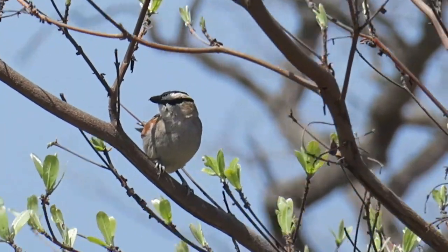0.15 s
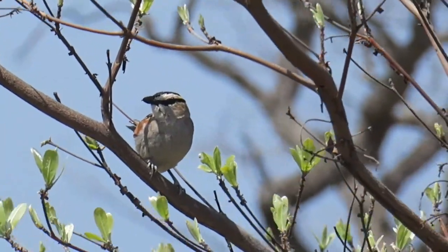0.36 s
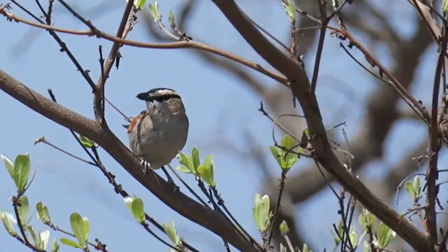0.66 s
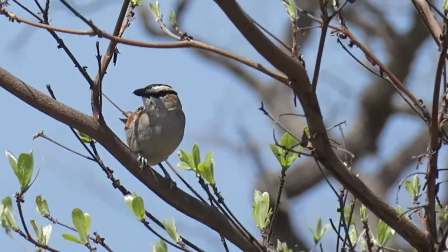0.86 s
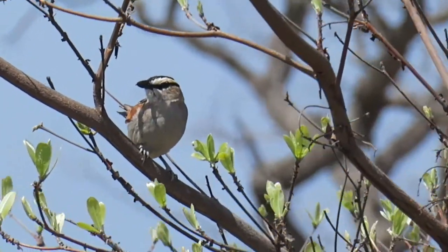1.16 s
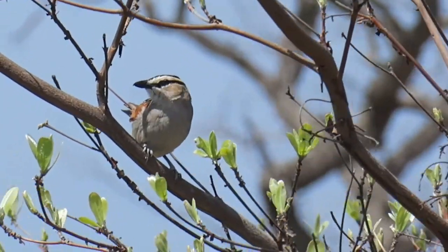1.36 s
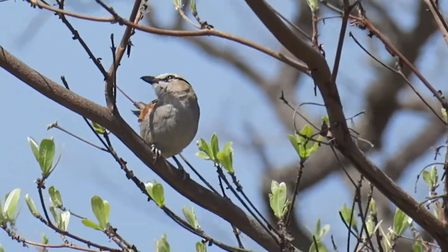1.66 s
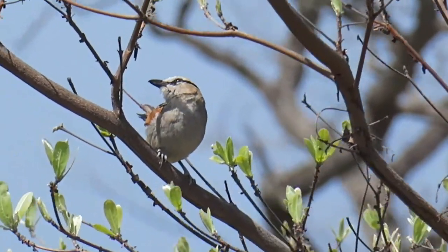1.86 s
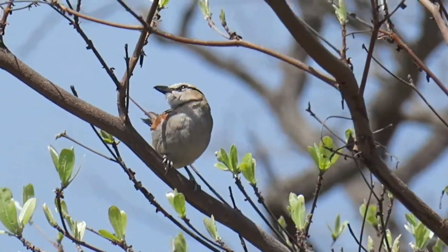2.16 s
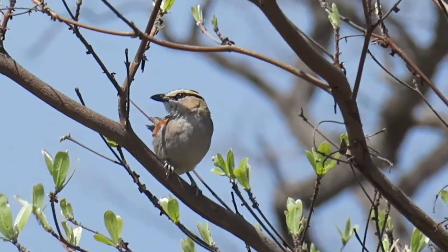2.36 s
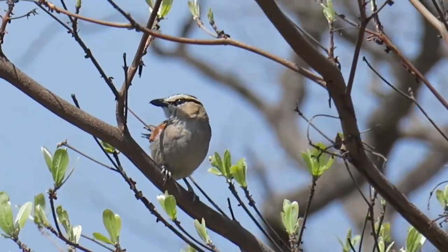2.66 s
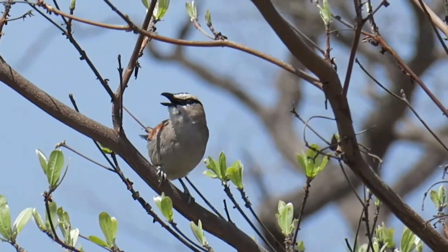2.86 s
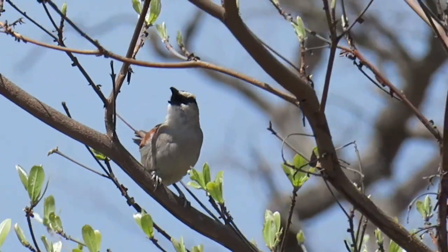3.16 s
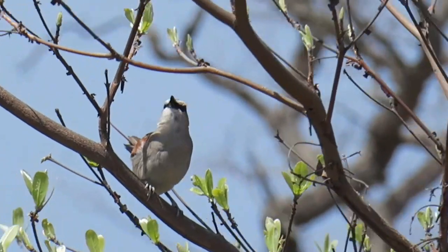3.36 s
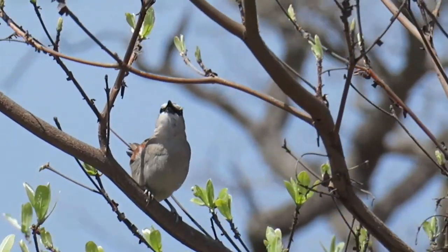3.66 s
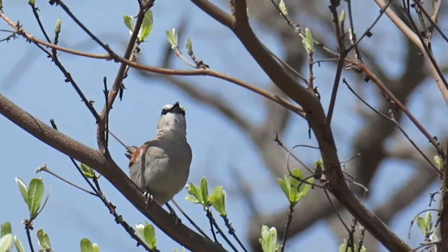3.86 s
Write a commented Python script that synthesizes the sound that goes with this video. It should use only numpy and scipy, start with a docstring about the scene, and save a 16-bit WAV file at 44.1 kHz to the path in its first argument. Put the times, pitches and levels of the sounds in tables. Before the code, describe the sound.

Clear, close shrike whistles follow softer falling bird calls over a light rumble of wind.

```python
"""A bush shrike whistles clean, loud notes close to a stereo microphone in bushland.
Deeper in the trees one bird sweeps down with a faint half-pitch tone under its calls, one flicks hooked
calls with a trill, one says 'tew'; far off one whines, and thin notes follow late on. Each call is a sine
or a stack of sines gliding in pitch and level; foliage scatters it and the trees echo it. Leaves rustle
in clumps of tiny clicks, and wind rumbles and thumps on the microphone over a distant hush."""
import sys
import numpy as np
from scipy import signal
from scipy.fft import rfft, irfft, next_fast_len
from scipy.io import wavfile
from scipy.ndimage import uniform_filter1d, map_coordinates

SR = 44100
rng = np.random.default_rng(int(sys.argv[2]) if len(sys.argv) > 2 else 0)


def output_pcm(signal):
    """Save a mono or channel-first signal as 16-bit PCM at the path in sys.argv[1].

    Samples are clipped to [-1, 1] before scaling.
    """
    pcm = np.clip(np.atleast_2d(signal).T, -1, 1) * 32767
    wavfile.write(sys.argv[1], SR, np.round(pcm).astype(np.int16))


N = 176400
LEAD_S = .2  # run-in, so echoes already ring at time zero
M = N + int(LEAD_S * SR)
T = np.arange(M) / SR - LEAD_S

# shrike's short whistles and its long one: (time [s], pitch [Hz], level [dB])
WHISTLES = [
    [(2.94, 2760, -65), (2.946, 2767, -61), (2.958, 2860, -58), (2.972, 3030, -70), (2.976, 3080, -67),
     (2.998, 3150, -64.5), (3.014, 3120, -54), (3.022, 3082, -53)],
    [(3.19, 2860, -69.5), (3.222, 2765, -48.5), (3.246, 2730, -41), (3.268, 2565, -42.5),
     (3.284, 2560, -35.5), (3.296, 2626, -42), (3.31, 2700, -32), (3.336, 2840, -31.5),
     (3.354, 2835, -34.5), (3.37, 2882, -43), (3.385, 2940, -66)],
    [(3.87, 2291, -68.5), (3.888, 2271, -47.5), (3.91, 2279, -31), (3.932, 2190, -22.5), (3.954, 2086, -23),
     (3.986, 1860, -31.5), (4.0, 1735, -31)],
]
LONG_WHISTLE = [(3.48, 1935, -68), (3.501, 1883, -52), (3.529, 2031, -30.5), (3.546, 2188, -21.5),
                (3.557, 2292, -24.5), (3.582, 2424, -29), (3.606, 2471, -23.5), (3.636, 2484, -27),
                (3.667, 2380, -30.5), (3.676, 2350, -26.5), (3.735, 2251, -23.5), (3.749, 2210, -26.5),
                (3.765, 2240, -53.5)]
# shrike's harmonics at full voice: (pitch multiple [ratio], gain [dB])
WHISTLE_TONES = [(1, 0.5), (2, -49), (3, -59), (4, -50), (5, -54), (6, -60.5)]
# falling sweeps, the opening one begun in the run-in: (time [s], pitch [Hz], level [dB])
OPENING_SWEEP = [(-.12, 6440, -68), (-.05, 5350, -51), (.005, 4300, -58.5), (.012, 4190, -61)]
SWEEPS = [
    [(0.078, 5940, -65), (0.096, 6460, -70), (0.125, 6060, -52.5), (0.187, 4940, -45), (0.219, 4260, -46.5),
     (0.229, 3920, -51)],
    [(0.311, 5870, -65), (0.326, 6500, -68), (0.355, 6025, -47.5), (0.423, 4610, -45), (0.445, 4060, -42.5),
     (0.451, 3920, -52)],
    [(1.13, 5680, -77), (1.17, 5600, -50), (1.204, 4980, -48.5), (1.23, 4370, -52), (1.244, 3890, -49.5),
     (1.252, 3550, -52)],
    [(1.418, 6460, -69), (1.446, 6370, -60), (1.52, 5250, -50.5), (1.564, 4110, -55), (1.574, 3900, -54)],
    [(1.69, 6550, -62), (1.702, 6560, -63), (1.722, 6090, -51), (1.788, 4880, -44.5), (1.822, 4100, -44.5),
     (1.832, 3840, -44)],
    [(2.21, 5620, -66), (2.242, 5350, -55), (2.27, 4630, -45), (2.28, 4440, -51), (2.296, 3930, -44.5),
     (2.305, 3660, -52)],
    [(3.125, 5420, -54), (3.137, 5330, -64.5), (3.153, 4910, -43.5), (3.165, 4570, -52.5),
     (3.189, 4000, -44.5), (3.202, 3490, -53)],
]
# half-pitch tone under each sweep: (gain [dB])
UNDERTONES_DB = [-30, -29, -30, -21, -30, -28, -30, -30]
# sweeps' balance at the microphone: (pitch [Hz], left over right [dB])
SWEEP_PAN = [(3800, -2.5), (4800, -6), (6000, 0.5), (6500, -7)]
# one hooked call: (time from start [s], pitch [Hz], gain [dB])
HOOK_SHAPE = [(0, 2690, -16), (.003, 3840, 1.5), (.008, 4334, -4), (.014, 4376, -4), (.02, 4044, -5),
              (.027, 3200, -0.5), (.032, 2600, -4), (.041, 1866, -13.5), (0.053, 1600, -22),
              (0.075, 1505, -20.5)]
# hooked calls: (start [s], level [dB], left over right [dB], trill length [s], trill level [dB])
HOOKS = [(0.525, -45, -7.5, 0.041, -68), (0.696, -43.5, -5, .092, -61), (2.405, -44, -4, 0.046, -64),
         (2.577, -42, -5.5, 0.076, -55.5)]
# 'tew' notes: (time [s], pitch [Hz], level [dB])
TEWS = [
    [(1.068, 3680, -47), (1.078, 3370, -55), (1.11, 2916, -39), (1.14, 2820, -62.5)],
    [(2.122, 3400, -53), (2.128, 3640, -56), (2.166, 2930, -44), (2.195, 2930, -49.5)],
    [(3.022, 3630, -50), (3.03, 3430, -46.5), (3.064, 2902, -40.5), (3.1, 2837, -63.5)],
]
# distant whine: (time [s], pitch [Hz], level [dB])
WHINE = [(2.04, 1000, -84), (2.065, 1190, -77), (2.12, 1310, -75), (2.19, 1400, -73), (2.21, 1390, -82)]
# partials of the whine and of a lone sine: (pitch multiple [ratio], gain [dB])
WHINE_TONES = [(2, 0), (3, 2), (4, 2), (5, -1), (6, -11)]
PURE = [(1, 0)]
# first a faint half-pitch tone under the sweeping bird's falling call at 1.4 s, then thin notes:
# (start [s], length [s], first pitch [Hz], last pitch [Hz], level [dB])
FAINT_GLIDES = [(1.408, 0.076, 3300, 3020, -72), (2.922, 0.016, 700, 1370, -61),
                (2.915, 0.026, 1376, 2500, -57), (2.927, 0.025, 1460, 1970, -53),
                (3.218, 0.064, 6440, 6160, -68), (3.395, .09, 6480, 6250, -68.5),
                (3.373, .045, 4050, 3890, -68.5), (3.387, 0.073, 3700, 3110, -71),
                (3.575, .11, 3540, 3360, -68), (3.8, .118, 3440, 3360, -68.5),
                (3.58, 0.075, 4190, 4080, -72), (3.805, 0.095, 4130, 3980, -71)]
# leaf clumps: (start [s], length [s], level before band limits [dB], bottom [Hz], top [Hz])
RUSTLES = [(1.46, 0.076, -60.5, 1500, 4230), (1.806, 0.15, -59.5, 4260, 10000),
           (2.32, 0.018, -47, 1500, 7500), (2.373, 0.018, -49, 1500, 7950), (2.4, .014, -55, 1500, 11000),
           (2.5515, 0.002, -54.5, 1500, 11000)]
# colour of the leaves, the wind rumble and the hush: (frequency [Hz], gain [dB])
LEAF_SPECTRUM = [(800, -49), (2000, 5), (2700, -1), (3500, 4.5), (5500, 1), (7000, -2.5), (8800, -9),
                 (10500, -18), (15700, -47.5)]
RUMBLE_SPECTRUM = [(15, -19.5), (30, -10.5), (60, -6), (100, -8.5), (200, -15), (500, -120)]
HUSH_SPECTRUM = [(20, -17.5), (54, -5.5), (146, -5), (232, -10.5), (450, -13.5), (800, -18), (1400, -25.5),
                 (2000, -26.5), (3500, -29), (6300, -34.5), (7200, -37), (8800, -40.5), (9800, -46.5),
                 (12500, -47.5), (15000, -61), (15800, -67)]
# wind rumble on the microphone: (time [s], level [dB])
WIND = [(0.0, -55.5), (0.18, -48), (0.33, -60), (0.82, -52.5), (0.93, -62), (1.25, -55), (1.9, -68.5),
        (1.97, -78), (2.2, -58.5), (2.84, -69), (3.391, -64.5), (4.0, -68.5)]
# gusts on the microphone ports: (time [s], frequency [Hz], peak level [dB])
THUMPS = [(.8, 51.5, -50), (1.035, 42.7, -46.5)]
# stereo width of the hush: (frequency [Hz], side over mid [dB])
HUSH_WIDTH = [(60, -25.5), (200, -9.5), (500, -6), (1300, 1), (4000, 1), (8000, 3.5), (14000, 10.5)]


def shrike():
    """Close to the microphone: clean whistles whose faint overtones grow with loudness."""
    song = sing([*WHISTLES, LONG_WHISTLE], WHISTLE_TONES, flicker_db=.15, pan=-1.8, full_db=-28.5)
    return echoes(one_sample_late(song, channel=1), wet_db=-26, t60=1, gap_s=.014)


def sweeping_bird():
    """Deep in the trees: falling sweeps with weak tones at half and three halves of the pitch."""
    song = np.zeros((2, M))
    for sweep, under_db in zip([OPENING_SWEEP, *SWEEPS], UNDERTONES_DB):
        tones = [(1 / 2, under_db), (1, 0), (3 / 2, -37)]
        song += sing([sweep], tones, flicker_db=3, pan=SWEEP_PAN, glide_samples=300)
    return echoes(one_sample_late(song, channel=0), wet_db=-8.5, t60=.56, gap_s=.006, foliage_db=-9)


def hook_bird(trill_delay_s=.08, trill_hz=1700, rise_hz_per_s=3600, beat_hz=186):
    """In foliage to the right: a quick rise and long fall, then a low beating trill."""
    song = np.zeros((2, M))
    beat = 1 + np.sin(2 * np.pi * beat_hz * T)
    for start, db, pan_db, length, trill_db in HOOKS:
        hook = [(start + offset, hz, db + gain) for offset, hz, gain in HOOK_SHAPE]
        last_hz = trill_hz + rise_hz_per_s * length
        trill = glide(start + trill_delay_s, length, trill_hz, last_hz, trill_db, fade_s=.03)
        song += sing([hook], PURE, flicker_db=1.3, pan=pan_db)
        song += beat * sing([trill], PURE, flicker_db=1.2, pan=pan_db)
    return echoes(one_sample_late(song, channel=0), wet_db=-10, t60=.65, gap_s=.0056, foliage_db=-5.5)


def tew_bird():
    """Well to the right: short, pure, dropping notes."""
    song = sing(TEWS, PURE, flicker_db=1.5, pan=-8)
    return echoes(song, wet_db=-10.5, t60=.8, gap_s=.013, foliage_db=-11.5)


def faint_calls():
    """A far whine with no fundamental, a half-pitch tone under the sweep at 1.4 s, later thin notes."""
    whine = sing([WHINE], WHINE_TONES, flicker_db=3, pan=-1.5)
    glides = sing([glide(*note, fade_s=.012) for note in FAINT_GLIDES], PURE, flicker_db=3.54, pan=-1.5)
    return echoes(whine + glides, wet_db=-11, t60=.3, gap_s=.01)


def leaves(grains_per_s=10000, spread_db=2.5, rise_share=.16, loss_db=1.5):
    """A little to the left: clumps of tiny leaf clicks that swell quickly, sag and stop."""
    def colour(hz):
        return amp(along(LEAF_SPECTRUM, hz))

    strikes = rng.random(M) < grains_per_s / SR
    grains = strikes * rng.standard_normal(M) * amp(spread_db * wobble(300))
    grains /= np.std(filtered(grains, colour))
    rustle = np.zeros(M)
    for start, length, db, bottom_hz, top_hz in RUSTLES:
        def band(hz):
            return colour(hz) / (1 + (hz / top_hz) ** 6) / (1 + (bottom_hz / (hz + 1)) ** 4)

        progress = np.clip((T - start) / length, 0, 1)
        envelope = amp(db - loss_db * progress) * np.minimum(progress / rise_share, 1) * (progress < 1)
        rustle += filtered(grains * envelope, band)
    return echoes(placed(rustle, pan_db=2.5), wet_db=-2, t60=.26, gap_s=.003)


def wind(gust_db=1.5, side_db=-14.5):
    """On the microphone: lumpy low rumble, near the centre."""
    mid, side = filtered(rng.standard_normal((2, M)), lambda hz: amp(along(RUMBLE_SPECTRUM, hz)))
    times, db = np.transpose(WIND)
    level_db = np.interp(T, times, db) + gust_db * wobble(3.7)
    return amp(level_db) * mid_side(mid, side * amp(side_db))


def thumps(half_width_s=.028):
    """Gusts give short low pushes, alike on both microphone ports."""
    return sum(amp(db) * np.exp(-((T - time) / half_width_s) ** 2) * np.cos(2 * np.pi * hz * (T - time))
               for time, hz, db in THUMPS)


def hush(mid_db=-57, drift_db=.24):
    """Distant air all round: steady noise, wide in the treble."""
    mid, side = rng.standard_normal((2, M))
    mid = filtered(mid, lambda hz: amp(along(HUSH_SPECTRUM, hz)))
    side = filtered(side, lambda hz: amp(along(HUSH_SPECTRUM, hz) + along(HUSH_WIDTH, hz)))
    return amp(mid_db + drift_db * wobble(2.3)) * mid_side(mid, side)


def echoes(x, wet_db, t60, gap_s, foliage_db=-40):
    """Direct sound, close scatter from foliage and the trees' lumpy, slowly changing answer."""
    trees_s, edge_s = .17, .013  # the farthest strong reflectors, how softly they end
    foliage_s, lumps_db = .012, 2
    out, step, t = x.copy(), SR // 8, np.arange(SR // 2) / SR
    reflectors = .25 + 1 / (1 + np.exp((t - trees_s) / edge_s))
    decay = amp(-60 * t / t60) * (1 - np.exp(-t / gap_s)) * reflectors
    for start in range(0, M, step):  # each overlapping piece gets its own echo
        tail = rng.standard_normal((2, len(t))) * decay * amp(lumps_db * wobble(60)[:len(t)])
        scatter = rng.standard_normal(len(t)) * np.exp(-t / foliage_s)
        answer = amp(wet_db) * tail / np.linalg.norm(tail[0])
        answer += amp(foliage_db) * scatter / np.linalg.norm(scatter)
        piece = x[:, start:start + 2 * step]
        window = np.sin(np.pi * np.arange(piece.shape[1]) / (2 * step))
        wet = signal.fftconvolve(piece * window, answer, axes=1)[:, :M - start]
        out[:, start:start + wet.shape[1]] += wet
    return out


def sing(notes, tones, flicker_db, pan, full_db=-200, glide_samples=88, edge_s=.004):
    """A bird's voice: wavering sine stacks; pan is left over right in dB, fixed or a table by pitch."""
    out = np.zeros((2, M))
    flicker = flicker_db * wobble(250)
    waver = .0012 * flicker_db * wobble(120)
    for note in notes:
        times, hz, db = np.transpose(note)
        on = (T >= times[0]) & (T < times[-1])
        t = T[on]
        pitch = uniform_filter1d(np.interp(t, times, hz), glide_samples, mode="nearest")
        pitch *= 1 + waver[on]
        phase = 2 * np.pi * np.cumsum(pitch) / SR
        level_db = np.interp(t, times, db)
        end = times[-1] + (times[-1] > T[-1])  # a note that outlasts the scene stays open
        edge = np.clip(np.minimum(t - times[0], end - t) / edge_s, 0, 1)
        soft_db = 2 * np.minimum(level_db - full_db, 0)  # overtones sink below full voice
        wave = np.zeros(len(t))
        for multiple, gain_db in tones:
            overtone_db = (multiple > 1) * (soft_db + 3 * wobble(45)[on])
            wave += amp(gain_db + overtone_db) * np.sin(multiple * phase)
        pan_db = pan if np.isscalar(pan) else along(pan, pitch)
        out[:, on] += placed(np.sqrt(2) * edge * amp(level_db + flicker[on]) * wave, pan_db)
    return out


def glide(start, length, first_hz, last_hz, db, fade_s):
    """A note that slides straight in pitch, swelling in and dying away."""
    fade = min(fade_s, length / 3)
    return [(start + offset, first_hz + (last_hz - first_hz) * offset / length, db + gain)
            for offset, gain in [(0, -10), (fade, 0), (length - fade, 0), (length, -10)]]


def one_sample_late(x, channel):
    """One microphone port (0 left, 1 right) hears the sound a sample after the other."""
    return np.array([np.roll(port, int(k == channel)) for k, port in enumerate(x)])


def placed(x, pan_db):
    """Mono to stereo, left over right by pan_db."""
    return np.array([x * amp(pan_db / 2), x * amp(-pan_db / 2)])


def mid_side(mid, side):
    """Left and right, scaled so the mid has unit strength."""
    return np.array([mid + side, mid - side]) / np.std(mid)


def amp(db):
    return 10 ** (np.asarray(db) / 20)


def along(points, hz):
    """A table's value at hz, on a log frequency axis."""
    freqs, values = np.transpose(points)
    return np.interp(np.log(hz + 1), np.log(freqs + 1), values)


def wobble(rate):
    """A smooth random curve, rate knots a second."""
    return map_coordinates(rng.standard_normal(int(M * rate / SR) + 4), [np.arange(M) * rate / SR])


def filtered(x, response):
    """x shaped by a frequency response."""
    size = next_fast_len(M + 8192)
    return irfft(rfft(x, size) * response(np.fft.rfftfreq(size, 1 / SR)), size)[..., :x.shape[-1]]


def scene():
    """Birds, leaves and air from one microphone position, after the run-in."""
    birds = shrike() + sweeping_bird() + hook_bird() + tew_bird() + faint_calls()
    return (birds + leaves() + hush() + wind() + thumps())[:, M - N:]


def record(dry, top_hz=15720):
    """The camera keeps nothing above its band limit."""
    return filtered(dry, lambda hz: hz < top_hz)


dry = scene()
out = record(dry)
output_pcm(out)
```